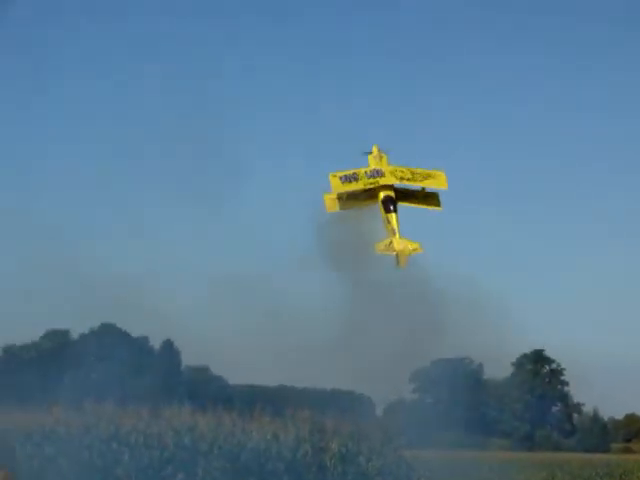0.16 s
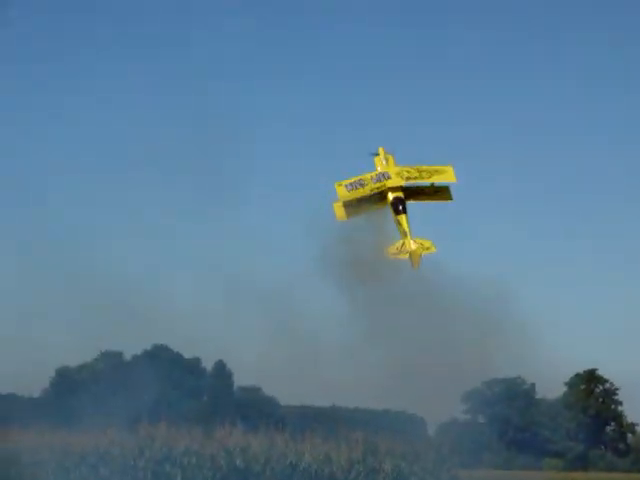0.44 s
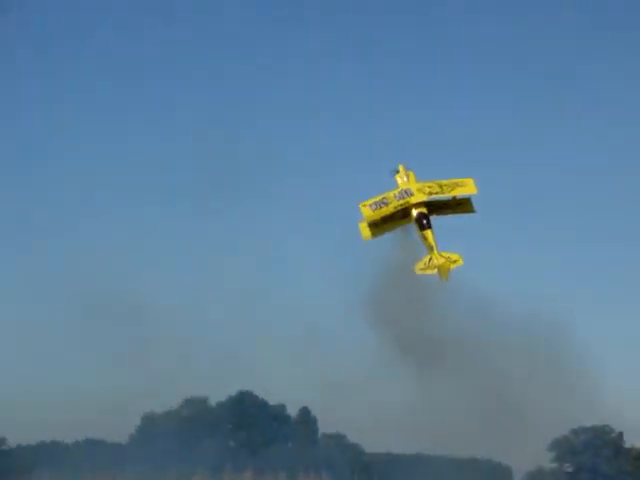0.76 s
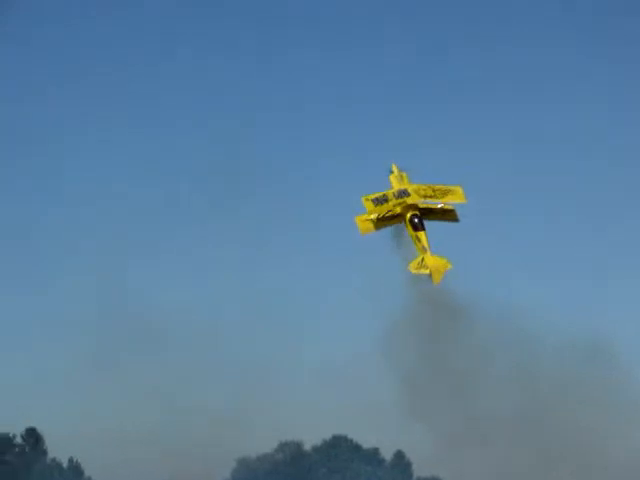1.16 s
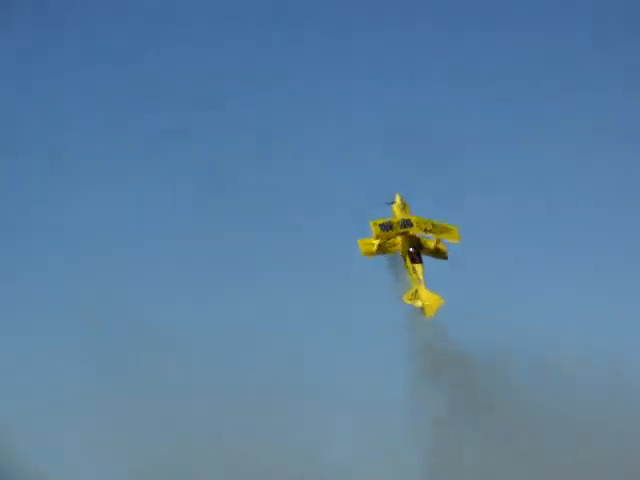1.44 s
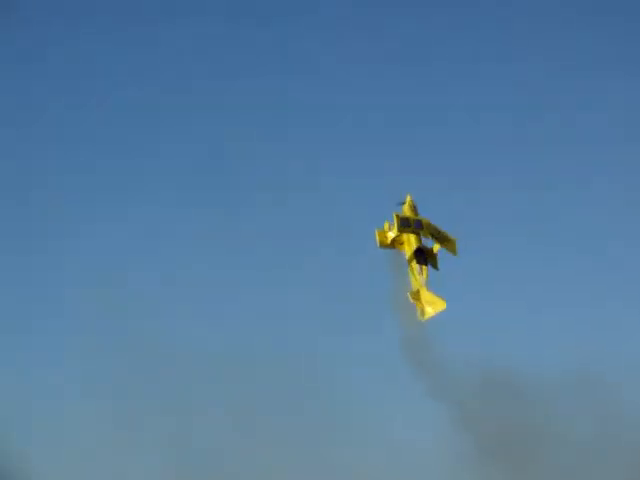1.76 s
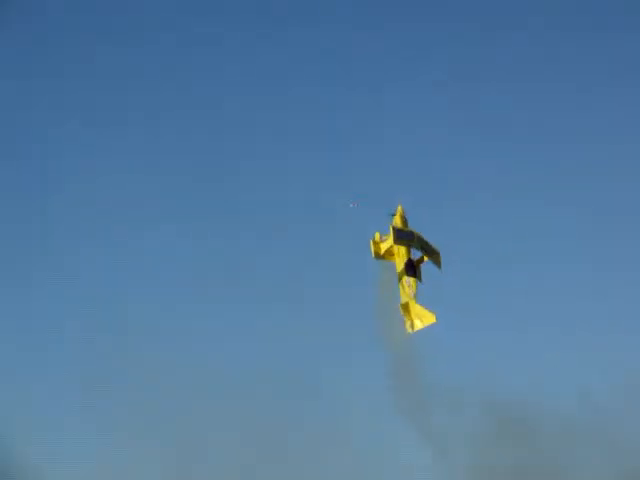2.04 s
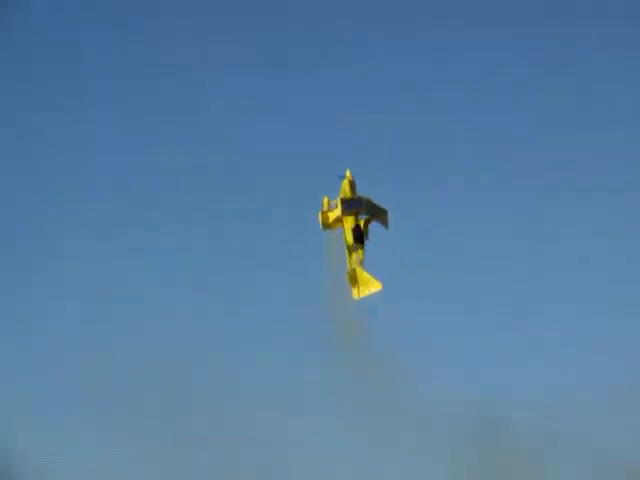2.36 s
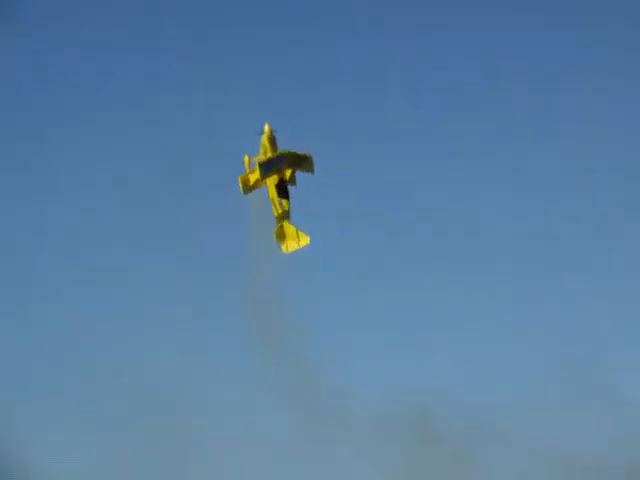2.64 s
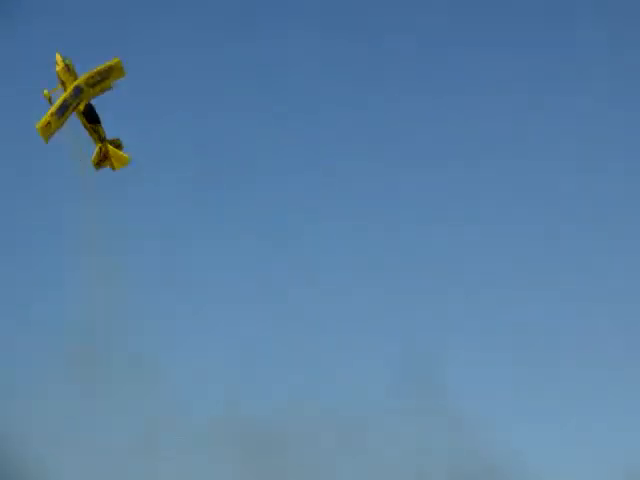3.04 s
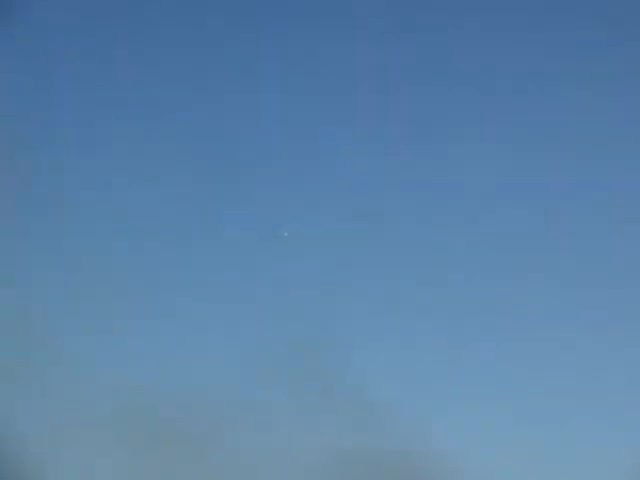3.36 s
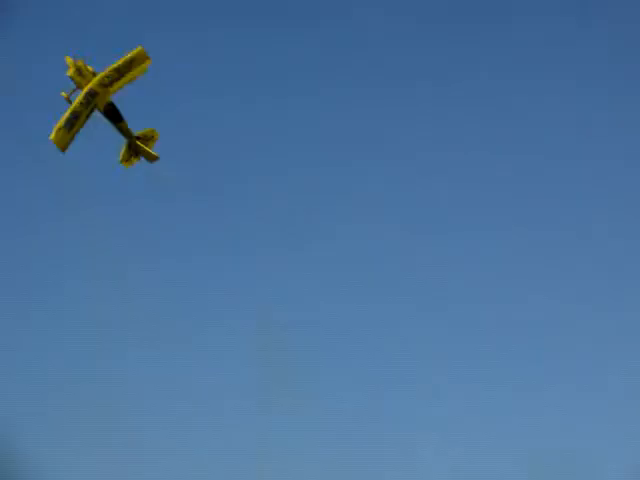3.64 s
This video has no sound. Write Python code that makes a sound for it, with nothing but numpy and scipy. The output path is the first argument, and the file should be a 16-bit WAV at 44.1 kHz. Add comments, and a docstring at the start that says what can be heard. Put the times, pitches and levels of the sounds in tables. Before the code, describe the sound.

A small model aeroplane engine buzzes continuously outdoors. It starts slightly lumpy, rises to a hard, crackling rasp by 0.7 seconds, then sags and softens around 1.1 to 1.7 with uneven firing. From 1.8 the throttle opens; pitch climbs, and by 2.2 a strong low propeller drone dominates, holding nearly steady before easing slightly near 3.8. Exhaust and propeller hiss pulse along, over a barely audible low rumble.

```python
"""A buzzing model biplane hangs on its propeller over a field, then opens the throttle, turns and climbs away.
Its engine fires once a turn; a strong tone at three times the shaft rate is probably the blades.
Uneven firings, summed from shaft harmonics, make a buzz whose colour changes as the plane turns.
Exhaust gas and propeller wash are noise that hisses in step with the shaft, over a faint low outdoor rumble."""
import sys
import numpy as np
from scipy import signal
from scipy.fft import rfft, irfft
from scipy.io import wavfile
from scipy.ndimage import uniform_filter1d

SR = 44100
rng = np.random.default_rng(int(sys.argv[2]) if len(sys.argv) > 2 else 0)


def master_out(mix):
    """Clip the mix to full scale and print it as 16-bit PCM to the path in sys.argv[1]."""
    frames = np.transpose(np.atleast_2d(mix))
    ceiling = np.clip(frames, -1, 1)
    pcm = np.round(ceiling * 32767).astype(np.int16)
    wavfile.write(sys.argv[1], SR, pcm)


N = 168021

# shaft speed: (time [s], speed [turns/s])
SHAFT_SPEED = [(0.0, 88.8), (0.12, 87.65), (0.19, 89.1), (0.27, 91.85), (0.36, 94.9), (0.48, 97.45),
               (0.61, 98.51), (0.75, 99.1), (0.88, 98.86), (0.96, 96.35), (1.08, 89.65), (1.18, 88.3),
               (1.36, 91.29), (1.58, 87.86), (1.68, 89.36), (1.96, 96.94), (2.07, 99.74), (2.22, 101.8),
               (2.38, 102.6), (2.8, 103.4), (3.26, 103.9), (3.44, 104.1), (3.68, 102.85), (3.81, 101.65)]
# turn from the hovering to the climbing aspect: (time [s], share [0-1])
TURN_TO_CLIMB = [(1.0, 0.04), (1.8, 0), (2.15, 0.46), (2.45, 1)]
# upper part of the buzz and its noise, before each one's trim: (time [s], level [dB])
RASP_LEVEL = [(0.0, -27), (0.08, -32), (0.32, -24), (0.43, -27), (0.72, -22), (1.07, -34.5), (1.3, -30.5),
              (1.55, -33), (1.89, -24.5), (2.2, -22), (2.6, -26), (3.1, -28.5), (3.81, -30.5)]
# multiples of the shaft rate that the drone plays: firing rate, hum, blade tone and its octave
DRONE_LINES = (1, 2, 3, 6)
PUFF_START_TURNS = .033  # where in the turn the gas bursts out


def undb(db):
    """Turn decibels into an amplitude factor."""
    return 10 ** (np.asarray(db) / 20)


def unit(x):
    """Scale to rms 1."""
    return x / np.sqrt(np.mean(x ** 2))


def curve(rows):
    """Join (time [s], value) rows by straight lines, one value per sample."""
    times, values = np.array(rows, float).T
    return np.interp(np.arange(N) / SR, times, values)


def walk(rate):
    """Smooth random wander that changes about rate times a second; rms 1."""
    hold = max(int(SR / rate), 2)
    steps = np.repeat(rng.standard_normal(N // hold + 2), hold)
    steps = steps[rng.integers(hold):][:N]
    return unit(uniform_filter1d(uniform_filter1d(steps, hold), hold // 2))


def noise(colour, gate=1):
    """White noise, gated and then filtered to the shape of a (frequency [Hz], level [dB]) colour; rms 1."""
    hz, db = np.array(colour, float).T
    bins_hz = np.arange(N + 1) * SR / (2 * N)
    gain = undb(np.interp(np.log(bins_hz + 1), np.log(hz), db))
    taps = np.fft.fftshift(irfft(gain))[N - 1024:N + 1025] * np.hanning(2049)
    return unit(signal.fftconvolve(rng.standard_normal(N) * gate, taps, mode="same"))


def per_turn(turns):
    """One random value for each turn of the shaft, joined by straight lines."""
    values = rng.standard_normal(N // 100)
    return np.interp(turns, np.arange(len(values)), values)


def lumpiness():
    """How unevenly the engine fires: 0 at high shaft speed, 1 when throttled back."""
    smooth_hz, lumpy_hz = 99.4, 89.4  # shaft turns per second
    return np.clip((smooth_hz - curve(SHAFT_SPEED)) / (smooth_hz - lumpy_hz), 0, 1)


def drone(turns):
    """Four clean low lines locked to the shaft; they flutter more when the engine runs lumpy."""
    # hum, twice a turn: (time [s], level [dB])
    hum = [(0.0, -37.5), (0.3, -28.5), (0.46, -38), (0.81, -33.5), (1.04, -42), (1.18, -39.5), (1.77, -38),
           (1.88, -47), (2.37, -34), (2.81, -37), (3.71, -24.5), (3.81, -29)]
    # blade tone, three times a turn: (time [s], level [dB])
    blade = [(0.0, -39), (0.19, -49), (0.24, -61), (0.43, -36), (0.75, -28), (1.04, -28), (1.15, -38.5),
             (1.35, -25.5), (1.59, -26), (2.06, -14.5), (2.51, -12), (3.56, -17.5), (3.73, -23.5),
             (3.81, -24.5)]
    # octave of the blade tone, six times a turn: (time [s], level [dB])
    octave = [(0, -32), (.11, -44), (.26, -26.5), (.45, -32), (.8, -28.5), (1.1, -34.5), (1.55, -35.5),
              (1.85, -44), (2.15, -28), (2.7, -24), (3.4, -25.5), (3.81, -25.5)]
    thump = -52 - 3.5 * curve(TURN_TO_CLIMB)  # firing rate [dB], weaker in the climb
    levels = (thump, curve(hum), curve(blade), curve(octave))
    flutter_db = 0.43 + 0.8 * lumpiness()
    out = 0
    for multiple, db in zip(DRONE_LINES, levels):
        gain = np.sqrt(2) * undb(db + flutter_db * walk(40))
        out = out + gain * np.sin(2 * np.pi * multiple * turns)
    return out


def harmonics(column, count=46):
    """Levels of all harmonics, and the minimum phases of a pulse that strikes and then rings with them."""
    # shaft harmonics, relative within their part: (multiple, hovering level [dB], climbing level [dB])
    strengths = [(4,-9,-15),(5,-9,-19),(9,-3,-5),(10,-10,-10),(11,-6,-16),(13,-11,-1),(15,-4,-11),(16,-12,-15),(17,-10,-20),
                 (18,-3,-18),(19,-16,-17),(20,-18,-5),(21,0,-10),(22,-12,-17),(23,-24,-19),(24,-10,-23),(25,-18,-25),(26,-25,-18),
                 (27,-17,-21),(28,-23,-14),(29,-21,-16),(30,-23,-19),(31,-25,-21),(32,-26,-17)]
    top_start_db, top_db_per_octave = -7.5, -5.5  # harmonics above the table
    table, multiples = np.array(strengths, float), np.arange(1, count + 1)
    octaves_above = np.log2(np.maximum(multiples / table[-1, 0], 1))
    db = np.interp(multiples, table[:, 0], table[:, column])
    db = db + top_start_db * (octaves_above > 0) + top_db_per_octave * octaves_above
    cepstrum = irfft(np.log(undb(np.append(db[0], db))))
    return db, 2 * rfft(cepstrum[:count], 2 * count).imag[1:]


def hardness():
    """Extra dB that makes the rasp bark out around each hard firing."""
    # hard firings: (time [s], rise above the others [dB])
    hard_firings = [(.666, 5), (.675, 6.5), (.7037, 6), (.7241, 4.5), (.8384, 4), (2.16, 4), (2.18, 5),
                    (2.1994, 5), (2.5511, 6), (2.6, 4)]
    width_s = .006
    t = np.arange(N) / SR
    return sum(db * np.exp(-((t - start) / width_s) ** 2) for start, db in hard_firings)


def buzz(turns):
    """Ringing of uneven firings: harmonics fade and drift in moving air; the upper ones slide through resonances."""
    # low part of the buzz: (time [s], level [dB])
    bark = [(.1, -31), (.3, -25.5), (.88, -28.5), (1.1, -31.5), (1.35, -28.5), (1.82, -25), (2.2, -33),
            (2.95, -36.5), (3.48, -25.5), (3.81, -39)]
    # middle part of the buzz: (time [s], level [dB])
    snarl = [(.08, -42), (.3, -27), (.85, -28), (1.1, -37.5), (1.3, -32), (1.6, -38.5), (1.82, -30.5),
             (2.45, -28.5), (3.81, -26)]
    # harmonics with swells of their own: multiple -> (time [s], level [dB]), before the lumpy flicker
    swells = { 7: [(.3, -31), (.6, -47), (.88, -42), (1.65, -53), (2.02, -25.5), (2.2, -31), (2.65, -45),
              (2.95, -31.5), (3.81, -33.5)], 8: [(.1, -35.5), (.33, -19.5), (.65, -26), (1.1, -36),
              (1.62, -37), (1.8, -25), (2.0, -41), (2.45, -30.5), (2.75, -39), (3.2, -25), (3.5, -25),
              (3.81, -40)], 12: [(1.6, -48), (2.0, -44), (2.45, -55), (2.8, -35.5), (3.45, -30),
              (3.81, -54)], 14: [(.1, -44), (.3, -29.5), (.75, -26), (1.1, -41), (2.0, -39), (2.2, -26),
              (2.7, -26), (3.15, -36.5), (3.5, -34), (3.72, -26.5)]}
    timing_turns, lumpy_turns = .0012, .007  # firing jitter, and what lumpy running adds
    smear_turns = .009  # each harmonic arrives this much ahead of the one below
    drift_rad, drift_per_s = .85, 1.5
    fade_db, lumpy_fade_db, fade_per_s = 3.25, 1.3, 5
    lumpy_blur = .7  # share by which the upper resonances blur when lumpy
    hover_hz, climb_hz = 98.7, 103.2  # shaft speeds at which the harmonic levels hold
    flicker_db = 2.5  # of the swelling harmonics when lumpy
    # spread from firing to firing; the minus sign makes the bark dip as the others rise
    bark_scatter_db, snarl_scatter_db, rasp_scatter_db = -1.14, 1.05, 2.5
    rasp_trim_db = -2.5

    aspect = np.clip(curve(TURN_TO_CLIMB), 0, 1)
    speed, lumpy = curve(SHAFT_SPEED), lumpiness()
    hover_db, hover_phase = harmonics(column=1)
    climb_db, climb_phase = harmonics(column=2)
    jitter = (timing_turns + lumpy_turns * lumpy) * per_turn(turns)
    angle = 2 * np.pi * (turns + jitter)
    strength, multiples = per_turn(turns), np.arange(1, len(hover_db) + 1)

    def line(k):
        """One harmonic of the shaft at rms 1, its phase drifting."""
        phase = (1 - aspect) * hover_phase[k - 1] + aspect * climb_phase[k - 1]
        phase = phase + np.pi * smear_turns * (k - 1) ** 2
        return np.sqrt(2) * np.cos(k * angle + phase + drift_rad * walk(drift_per_s))

    def resonance(k, db, hz):
        """Level of a harmonic as its frequency slides through resonances that stay put."""
        place = k * speed / hz
        sharp = np.interp(place, multiples, db)
        blurred = np.interp(place, multiples, uniform_filter1d(db, size=7))
        return sharp + lumpy_blur * lumpy * (blurred - sharp)

    def part(order, count, sliding=False):
        """A run of neighbouring harmonics, each fading on its own, at even overall power."""
        out, power = 0, 0
        for k in range(order, order + count):
            if k in DRONE_LINES or k in swells:
                continue
            hover, climb = hover_db[k - 1], climb_db[k - 1]
            if sliding:
                hover, climb = resonance(k, hover_db, hover_hz), resonance(k, climb_db, climb_hz)
            fade = (fade_db + lumpy_fade_db * lumpy) * walk(fade_per_s)
            gain = undb(hover + aspect * (climb - hover) + fade)
            out, power = out + gain * line(k), power + gain ** 2
        return out / np.sqrt(power)

    swelling = 0
    for k, rows in swells.items():
        flicker = flicker_db * lumpy * (walk(29.85) - 1.5)  # also lowers the line when lumpy
        swelling = swelling + line(k) * undb(curve(rows) + flicker)
    low = swelling + part(order=4, count=8) * undb(curve(bark))
    low = low * undb(bark_scatter_db * strength)
    middle = part(order=12, count=6) * undb(curve(snarl) + snarl_scatter_db * strength)
    rasp_db = curve(RASP_LEVEL) + hardness() + rasp_trim_db + rasp_scatter_db * strength
    upper = part(order=18, count=29, sliding=True) * undb(rasp_db)
    return low + middle + upper


def spit(turns):
    """A short spike at each firing, of very uneven size, that decays within the turn."""
    decay_turns, scatter_db = .16, 2.2
    since = turns - PUFF_START_TURNS + 1
    sizes = undb(scatter_db * np.clip(rng.standard_normal(N // 100), -2, 2))
    return sizes[since.astype(int)] * np.exp(-(since % 1) / decay_turns)


def exhaust_gas(turns, spikes):
    """A puff of turbulent noise follows each firing, with a crackle at its front."""
    # rush of gas: (time [s], level [dB])
    gas = [(0, -26.5), (.12, -32), (.3, -28), (.55, -30), (.88, -28), (1.08, -31), (1.35, -29),
           (1.6, -29.5), (1.9, -25.5), (2.2, -27.5), (2.9, -29.5), (3.81, -28)]
    # colour of the rush, shape only: (frequency [Hz], level [dB])
    gas_colour = [(150, -22.5), (250, -8.5), (340, 3), (470, -3), (560, -8.5), (730, -3.5), (950, -3.5),
                  (1150, -12.5), (1400, -1.5), (1750, -10.5), (2200, -23), (3300, -22.5)]
    # colour of the crackle, shape only: (frequency [Hz], level [dB])
    crackle_colour = [(1200, -29), (1700, -3), (2120, -1), (2450, -1), (2950, -11), (3600, -24.5),
                      (5000, -31.5)]
    decay_turns, floor, scatter_db, crackle_trim_db = .25, .42, 2.1, -7.5
    since = (turns - PUFF_START_TURNS) % 1
    puff = (floor + np.exp(-since / decay_turns)) * undb(scatter_db * per_turn(turns))
    rush = noise(gas_colour, puff) * undb(curve(gas))
    crackle_db = curve(RASP_LEVEL) + hardness() + crackle_trim_db
    return rush + noise(crackle_colour, puff / 2 + spikes) * undb(crackle_db)


def wash(turns, spikes):
    """Propeller hiss that spits with each firing and throbs, most in the climb, with each blade."""
    # hiss before its trim: (time [s], level [dB])
    hiss = [(0.0, -31), (0.11, -32), (0.29, -29), (0.86, -31), (1.05, -36.5), (1.58, -35), (1.88, -29),
            (2.03, -29.5), (2.06, -31), (3.0, -38), (3.31, -32.5), (3.47, -35), (3.81, -35)]
    # colour of the hiss, shape only: (frequency [Hz], level [dB])
    hiss_colour = [(1800, -6), (2900, 3.5), (3700, -0.5), (4200, 0.5), (4800, 2.5), (5400, 0.5), (6200, -2),
                   (7500, -4.5), (8800, -7), (10000, -9.5)]
    spit_depth, flicker_db, trim_db = .9, .6, 1.5
    blade_depth = .12 + .27 * curve(TURN_TO_CLIMB)
    blades = np.cos(3 * 2 * np.pi * turns)
    throb = 1 + spit_depth * spikes + blade_depth * blades
    return noise(hiss_colour, throb) * undb(curve(hiss) + trim_db + flicker_db * per_turn(turns))


def air():
    """Faint low rumble of the open air: noise weighted to the bottom octaves."""
    # colour of the rumble, shape only: (frequency [Hz], level [dB])
    rumble_colour = [(20, -6), (45, -9), (90, 2), (150, 2.5), (250, -19.5), (500, -35.5)]
    # rumble: (time [s], level [dB])
    rumble = [(0, -56), (.7, -49), (1.1, -54), (1.6, -55), (2.0, -42), (2.75, -42.5), (3.15, -55),
              (3.81, -61)]
    return noise(rumble_colour) * undb(curve(rumble))


def scene():
    """One slightly wobbling shaft drives every part of the engine's sound; the air lies beneath."""
    wobble = .0004 * walk(24.72)  # share of the shaft speed
    turns = np.cumsum(curve(SHAFT_SPEED) * (1 + wobble)) / SR
    spikes = spit(turns)
    engine = drone(turns) + buzz(turns) + exhaust_gas(turns, spikes)
    return (engine + wash(turns, spikes) + air())[None]


def record(dry):
    """A steep low-pass cuts off the top of the treble."""
    top_hz = 10050
    return signal.sosfilt(signal.ellip(12, .2, 80, top_hz, fs=SR, output="sos"), dry)


dry = scene()
out = record(dry)
master_out(out)
```